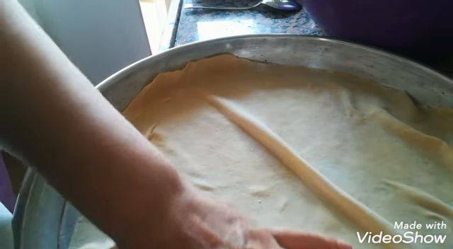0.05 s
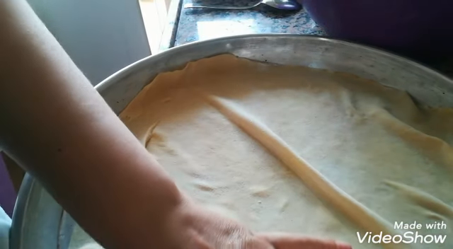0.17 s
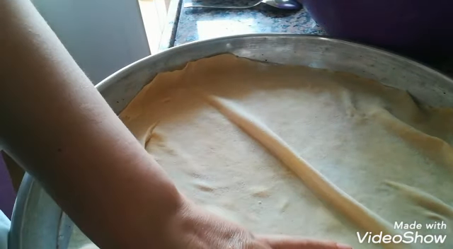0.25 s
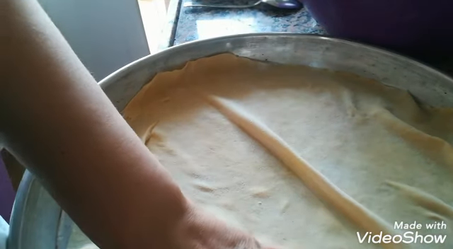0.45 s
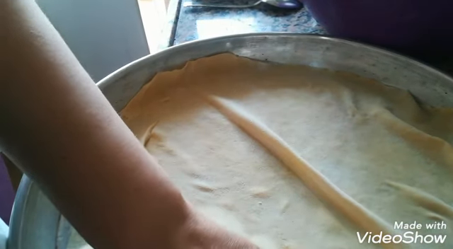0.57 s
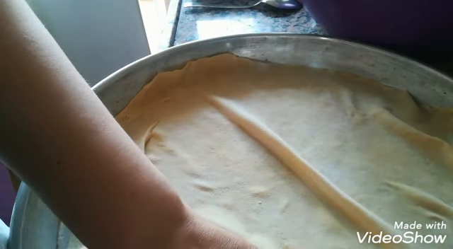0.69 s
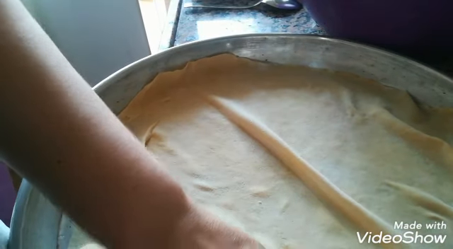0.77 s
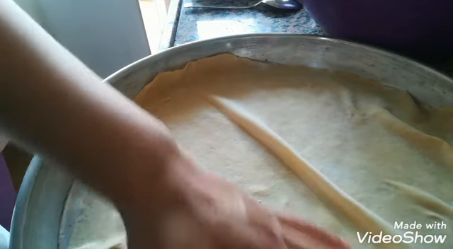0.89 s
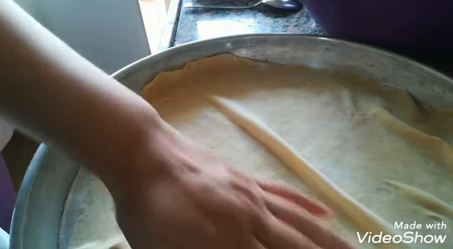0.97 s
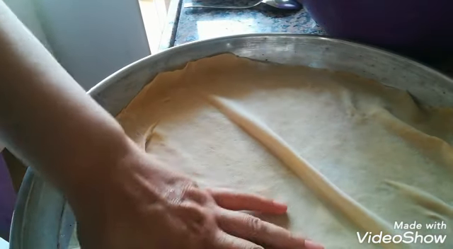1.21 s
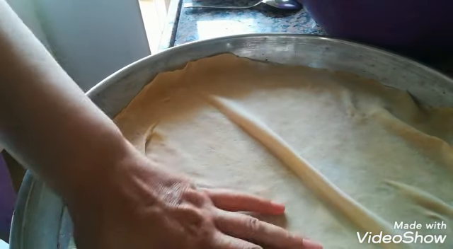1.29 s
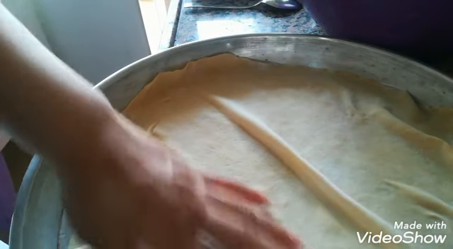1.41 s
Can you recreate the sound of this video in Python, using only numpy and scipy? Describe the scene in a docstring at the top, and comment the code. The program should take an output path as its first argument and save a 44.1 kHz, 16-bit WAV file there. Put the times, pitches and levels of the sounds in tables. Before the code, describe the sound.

A metal tray of dough knocks on a stone counter at about 0.2 seconds: a sharp, bright clack with a quickly damped ring and a low thud underneath. A much softer, duller tap follows at about 1.35 seconds, with faint low bumps around it. Both echo briefly in a small, hard-walled kitchen. A quiet low rumble and faint hiss continue throughout.

```python
"""Baking tray on a stone counter

A round metal tray with dough in it knocks twice on a kitchen counter, the second time softly.
Each knock is a quick chatter of contacts and a short, dough-damped ring that the small hard room
carries on. The tray's weight thuds underneath, over a low room rumble and faint hiss."""
import sys
import numpy as np
from scipy import signal
from scipy.fft import rfft, irfft
from scipy.io import wavfile

SR = 44100
rng = np.random.default_rng(int(sys.argv[2]) if len(sys.argv) > 2 else 0)


def unload_audio(sound):
    """Save the sound as a 16-bit wav file, at the path given as the first command line argument."""
    columns = np.transpose(np.atleast_2d(sound))
    # keep every value between -1 and 1, then stretch to whole-number steps
    steps = np.round(np.clip(columns, -1, 1) * 32767)
    wavfile.write(sys.argv[1], SR, steps.astype(np.int16))


N = 63945


def amp(db):
    """Decibels to gain."""
    return 10 ** (np.asarray(db) / 20)


def unit_rms(x):
    """Scales to rms 1."""
    return x / np.sqrt(np.mean(x ** 2) + 1e-20)


def curve_at(points, hz):
    """Interpolates (freq_hz, value) rows on a log-frequency axis."""
    freq_hz, value = np.transpose(points)
    return np.interp(np.log(hz + 1), np.log(freq_hz + 1), value)


def add(mix, start_s, sound):
    """Adds a sound into the stereo mix."""
    part = mix[:, max(round(start_s * SR), 0):][:, :sound.shape[-1]]
    part += sound[..., :part.shape[1]]


def minimum_phase(spectrum_db, taps=2048):
    """Unit-energy impulse response with a sharp front."""
    log_gain = np.log(amp(np.r_[spectrum_db, spectrum_db[-2:0:-1]]))
    response = np.fft.ifft(np.exp(np.conj(signal.hilbert(log_gain)))).real[:taps]
    return response / np.linalg.norm(response)


def tray_knocks():
    """The rim meets the counter; returns the cracks and the rings."""
    # start_s, ring_db, rim_place (0-1), crack_db, tilt_db_per_octave
    knocks = [(0.2344, -16.5, 0.03, -21.5, 0.5), (1.3540, -35, 1, -41, -2)]
    crack_lead_s = .0008
    cracks, rings = np.zeros((2, 2, N))
    for start_s, ring_db, rim_place, crack_db, tilt_db_per_octave in knocks:
        add(cracks, start_s - crack_lead_s, amp(crack_db) * contact_crack(tilt_db_per_octave))
        add(rings, start_s, amp(ring_db) * tray_ring(rim_place))
    return cracks, rings


def contact_crack(tilt_db_per_octave):
    """Metal chatters on stone: three tiny noise bursts a millisecond or two apart."""
    # delay_s, gain_db
    contacts = [(0, -2.5), (.001, 4), (.0029, 1)]
    # freq_hz, gain_db
    spectrum = [(150, -18.5), (450, -24.5), (800, -22.5), (1800, -12.5), (2400, 0), (3500, 4.5),
                (4200, -11.5), (6300, -5), (8000, -22.5), (10500, -33.5), (14500, -67.5)]
    decay_s = .0018
    t = np.arange(1024) / SR
    bursts = np.zeros((2, 2 * len(t)))
    for delay_s, gain_db in contacts:
        add(bursts, delay_s, amp(gain_db) * np.exp(-t / decay_s) * rng.choice([-1., 1.], (2, len(t))))
    hz = np.fft.rfftfreq(4096, 1 / SR)
    colour = minimum_phase(curve_at(spectrum, hz) + tilt_db_per_octave * np.log2(hz + 20))
    return 2 * signal.fftconvolve(bursts, colour[None], axes=1)


def tray_ring(rim_place):
    """Dough-damped modes swell during the chatter and die fast; the place struck sets their mix."""
    # pitch_hz, t60_s, place0_db, place1_db
    modes = [(1034, 0.054, -15.5, -14.5), (1173, .04, -19.5, -1.5), (1499, 0.042, -7.5, -26),
             (1802, 0.031, -37, -6), (2153, 0.021, -15.5, -13.5), (2278, 0.028, -5.5, -9),
             (2431, 0.016, -4, -8), (2740, 0.025, -9, -5), (2860, 0.016, -20, -3), (3290, 0.06, -4, -23),
             (3527, 0.082, 0, -6.5), (3684, 0.05, 5, 6.5), (4340, 0.041, -11, -6), (4719, 0.034, 10.5, -1),
             (5360, 0.049, -17, -16), (6056, 0.027, 1.5, -14), (6330, 0.015, -12, -28),
             (7070, .04, -13, -42), (7530, 0.054, -12.5, -39), (8230, 0.033, -21, -40),
             (9160, 0.056, -27.5, -40)]
    rise_s, left_delay_s = .002, .0001
    t = np.arange(SR // 4) / SR
    stereo_t = t - np.array([[left_delay_s], [0]])
    ring = np.zeros_like(stereo_t)
    for pitch_hz, t60_s, place0_db, place1_db in modes:
        struck_db = place0_db + rim_place * (place1_db - place0_db)
        ring += amp(struck_db - 60 * t / t60_s) * np.sin(2 * np.pi * pitch_hz * stereo_t)
    return ring * np.sin(np.pi / 2 * np.minimum(t / rise_s, 1)) ** 2


def weight_thuds():
    """Low swings of the loaded tray and counter, alike in both channels."""
    # start_s, pitch_hz, level_db, rise_s, t60_s
    swings = [(0.192, 155, -44, .004, 0.11), (.236, 96.4, -33.5, 0.028, 0.29),
              (.240, 62.3, -50, 0.045, 0.85), (0.237, 262.5, -50, .015, 0.35),
              (1.228, 32.3, -51.5, 0.019, 0.81), (1.23, 87, -50, 0.0071, .15),
              (1.357, 103.3, -45, 0.052, 0.84)]
    t = np.arange(SR) / SR
    thuds = np.zeros((2, N))
    for start_s, pitch_hz, level_db, rise_s, t60_s in swings:
        envelope = np.minimum(t / rise_s, 1) * amp(level_db - 60 * t / t60_s)
        add(thuds, start_s, envelope * np.sin(2 * np.pi * pitch_hz * t))
    return thuds


def kitchen_reverb(direct):
    """Dense reflections off hard walls, each band dying at its own rate."""
    # freq_hz, t60_s
    decay_times = [(200, .45), (1000, 0.32), (2500, 0.39), (4800, 0.33), (8000, 0.42), (14000, 0.15)]
    # freq_hz, gain_db
    band_gains = [(200, 2), (650, 8.5), (1100, 5), (1600, 0), (2500, -1.5), (3500, -7.5), (4800, -5.5),
                  (7000, -7.5), (12000, -4)]
    gap_s, build_s = .0017, .0027
    hz, t, noise = signal.stft(rng.choice([-1., 1.], (2, SR)), SR, nperseg=256)
    t60_s = curve_at(decay_times, hz)[:, None]
    envelope = amp(curve_at(band_gains, hz)[:, None] - 60 * t / t60_s)
    energy_norm = np.sqrt(2 * np.log(1000) / (t60_s * SR))
    tail = signal.istft(noise * envelope * energy_norm, SR, nperseg=256)[1]
    onset = np.clip((np.arange(tail.shape[1]) / SR - gap_s) / build_s, 0, 1)
    return signal.fftconvolve(direct, tail * onset, axes=1)[:, :N]


def rumble_and_hiss():
    """Low room rumble, common to both channels, and a wide, faint hiss with a few soft resonances."""
    # freq_hz, gain_db; filters the hiss with a notch near 11.5 kHz
    spectrum = [(12, -7), (30, -11.5), (55, -11), (97, 2.5), (130, -6.5), (215, 0.5), (275, -9.5),
                (350, -9.5), (410, -18), (520, -20), (1000, -18.5), (1800, -17.5), (2800, -24.5),
                (5000, -26.5), (7700, -29), (9500, -33.5), (11500, -48), (13500, -32.5), (14500, -70)]
    # centre_hz, width_hz, lift_db
    resonances = [(734, 17, 10), (1457, 100, 4.5), (3700, 790, 7), (4570, 270, 4.5), (5600, 390, 7.5)]
    # freq_hz, left_right_coherence
    stereo_coherence = [(60, 0.97), (130, 1), (290, 0.9), (630, 0), (1400, 0.29), (3000, 0)]
    # freq_hz, right_over_left_db
    balance = [(200, -0.5), (350, 4.5), (720, -5), (1100, 1.5), (6000, 0), (13000, 6)]
    rms_db = -55
    hz = np.fft.rfftfreq(N, 1 / SR)
    left, independent = rfft(rng.standard_normal((2, N)))
    coherence = curve_at(stereo_coherence, hz)
    right = coherence * left + np.sqrt(1 - coherence ** 2) * independent
    shape_db = curve_at(spectrum, hz)
    for centre_hz, width_hz, lift_db in resonances:
        shape_db += lift_db / (1 + (2 * (hz - centre_hz) / width_hz) ** 2)
    pan_db = np.array([[-.5], [.5]]) * curve_at(balance, hz)
    noise = irfft(np.array([left, right]) * amp(shape_db + pan_db), N)
    return amp(rms_db) * unit_rms(noise)


def scene():
    """Knocks and their reverberation over thuds, rumble and hiss."""
    crack_send_db = -2  # the crack excites the room less than the broad sheet's ring
    cracks, rings = tray_knocks()
    reverb = kitchen_reverb(rings + amp(crack_send_db) * cracks)
    return cracks + rings + reverb + weight_thuds() + rumble_and_hiss()


def record(dry):
    """Soft overload at full scale, then a steep low-pass."""
    cutoff_hz = 14600
    limited = dry / (1 + dry ** 4) ** .25
    lowpass = signal.firwin(511, cutoff_hz, window=("kaiser", 9), fs=SR)
    return signal.oaconvolve(limited, lowpass[None], "same")


dry = scene()
out = record(dry)
unload_audio(out)
```